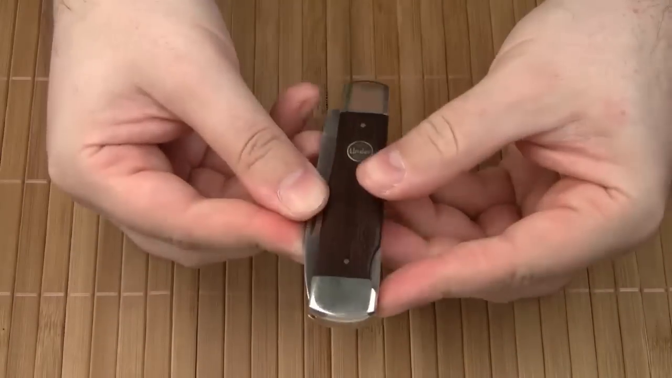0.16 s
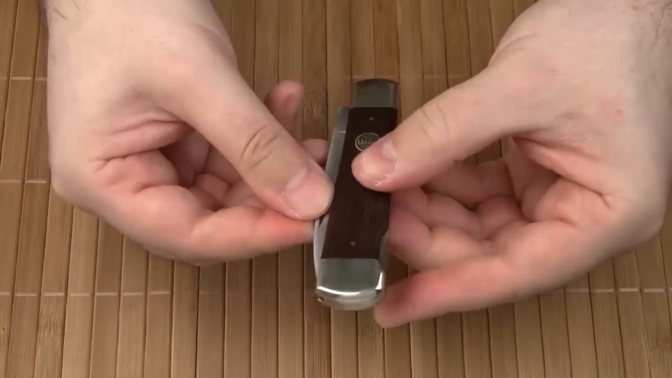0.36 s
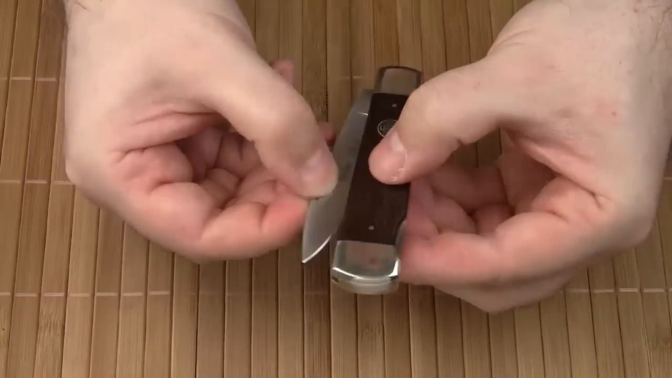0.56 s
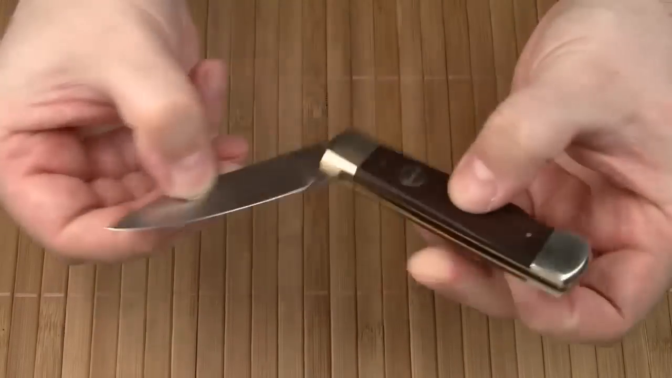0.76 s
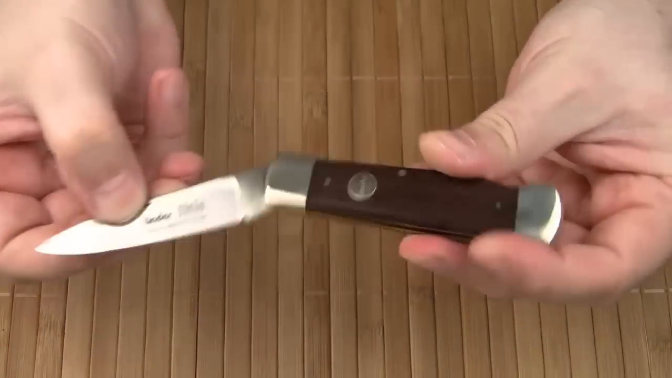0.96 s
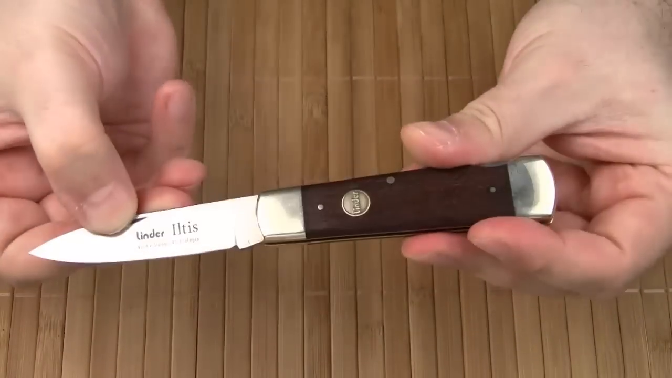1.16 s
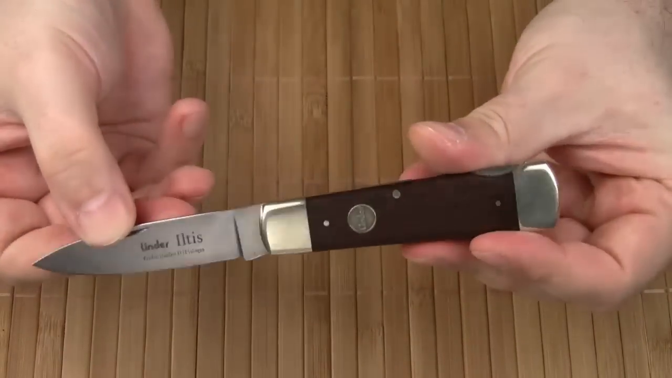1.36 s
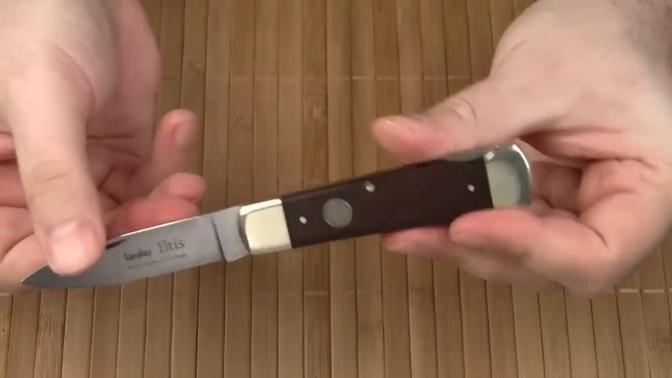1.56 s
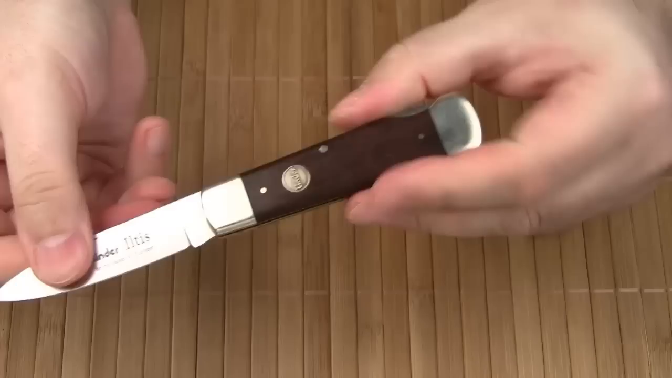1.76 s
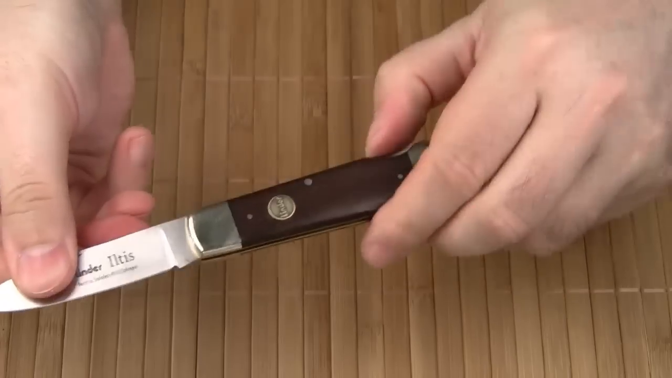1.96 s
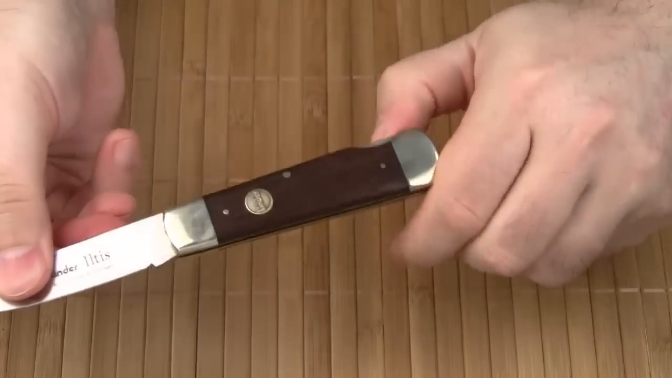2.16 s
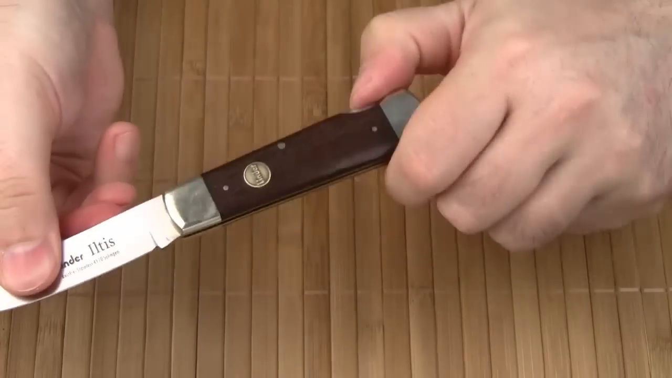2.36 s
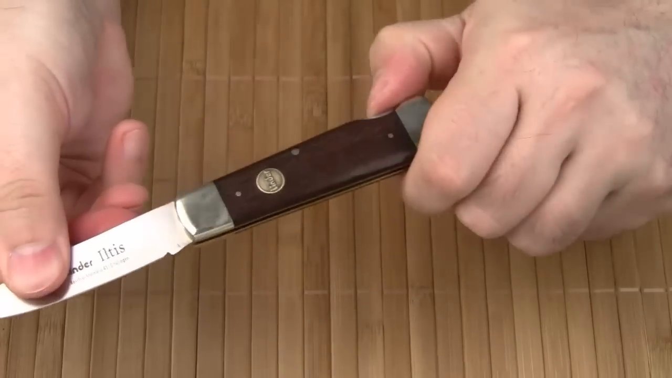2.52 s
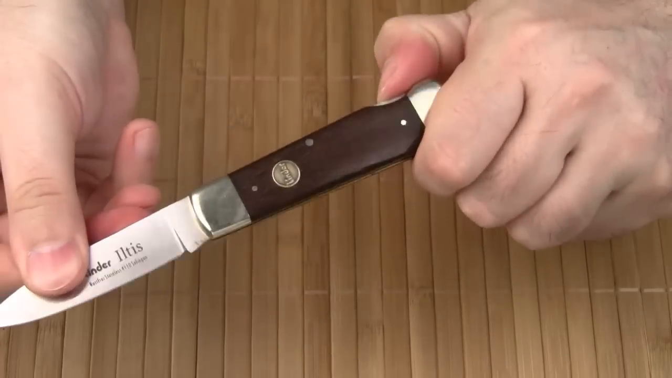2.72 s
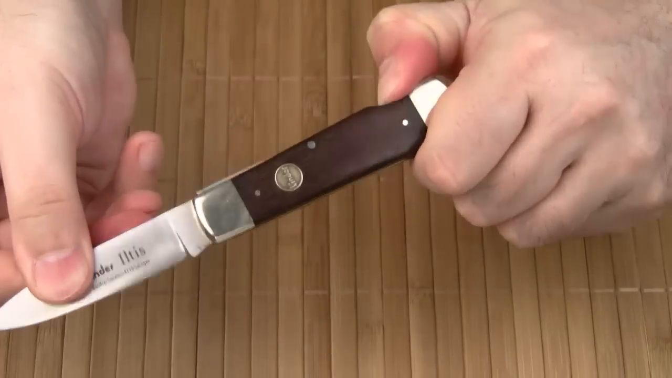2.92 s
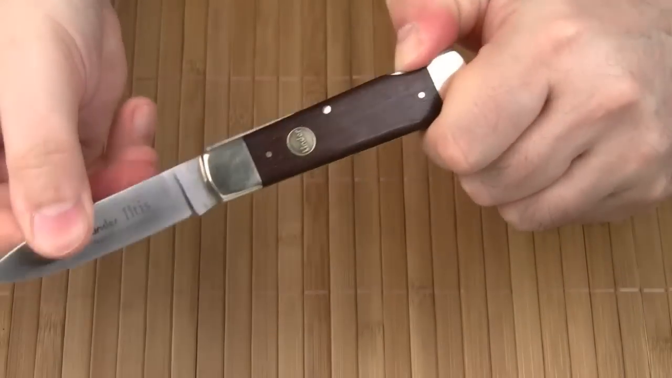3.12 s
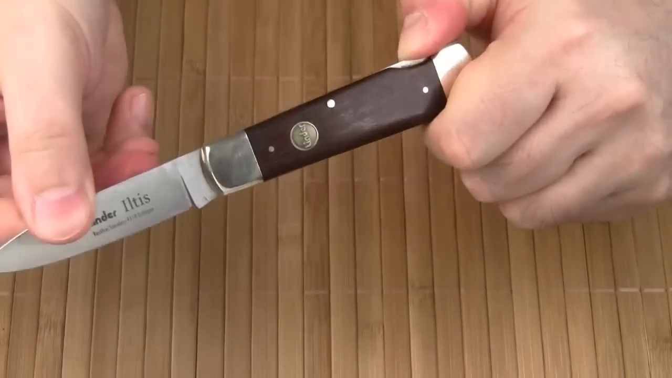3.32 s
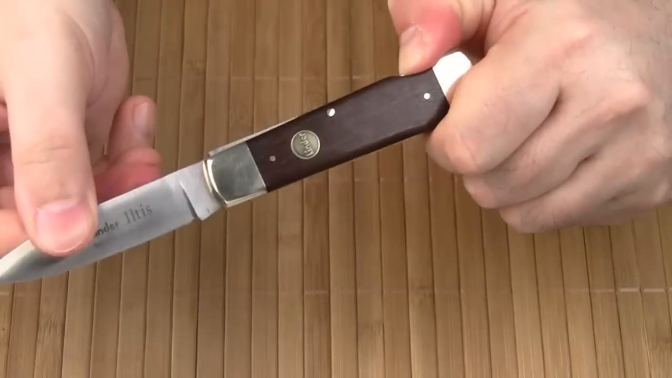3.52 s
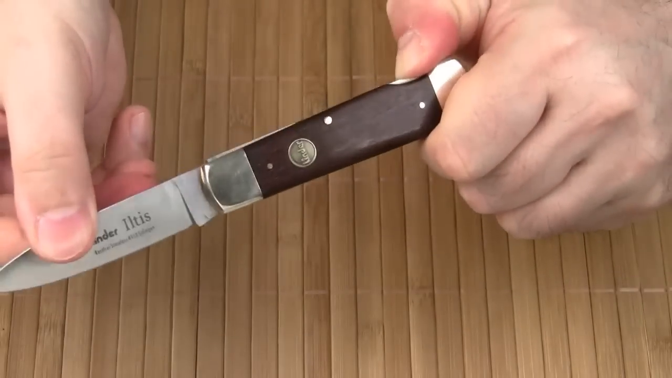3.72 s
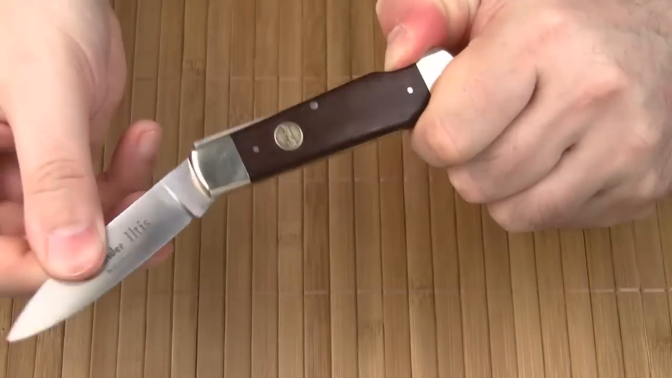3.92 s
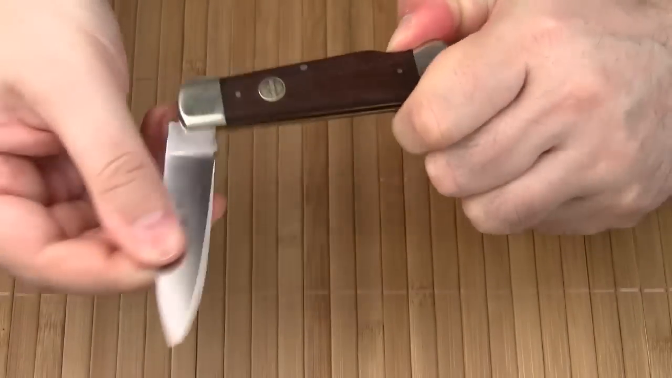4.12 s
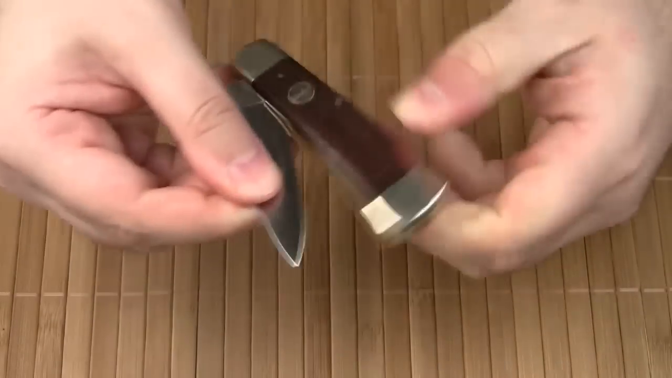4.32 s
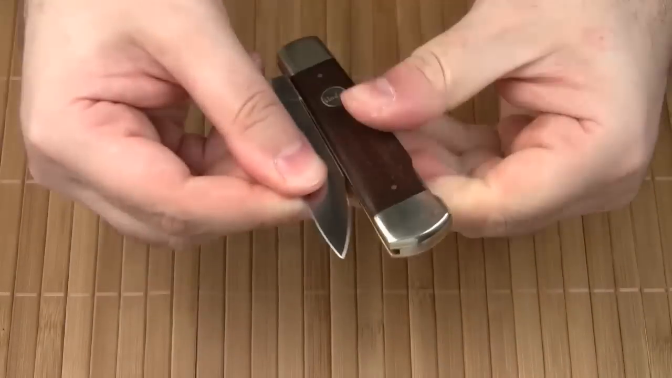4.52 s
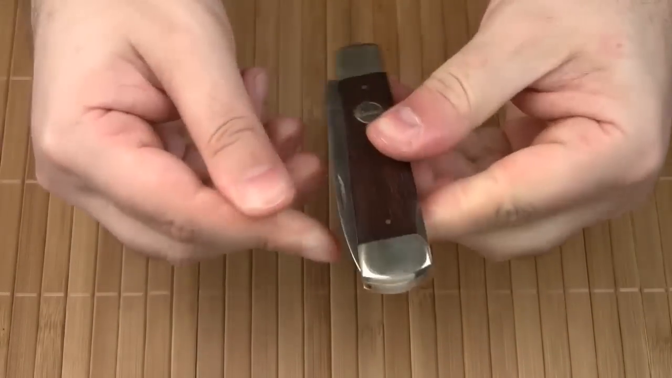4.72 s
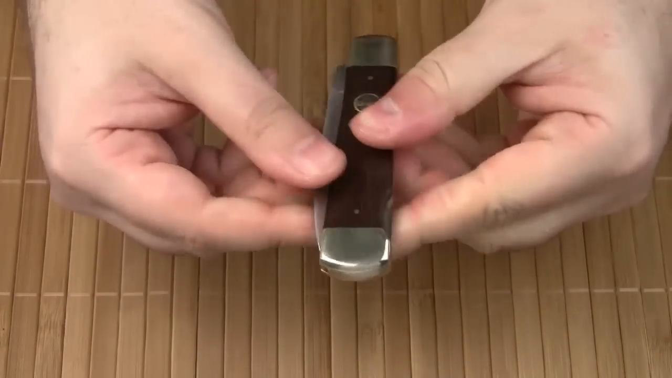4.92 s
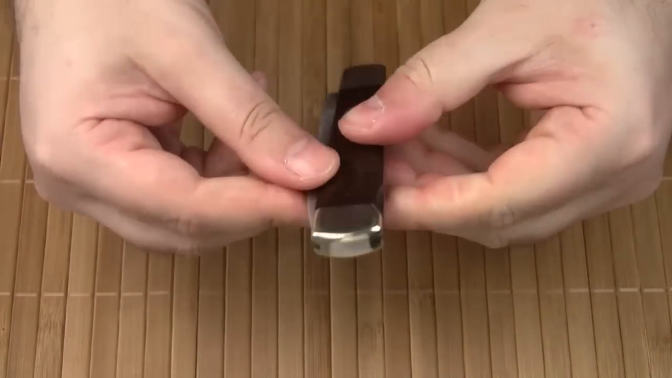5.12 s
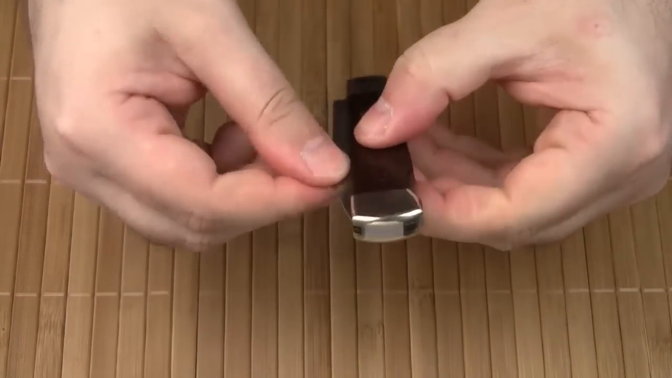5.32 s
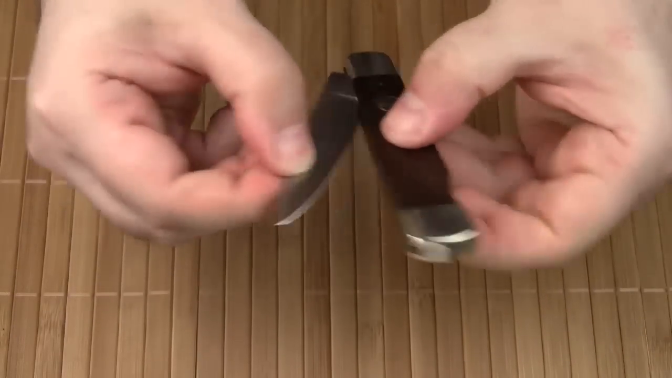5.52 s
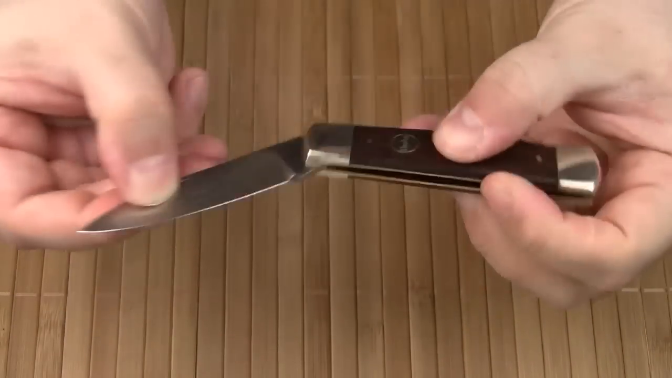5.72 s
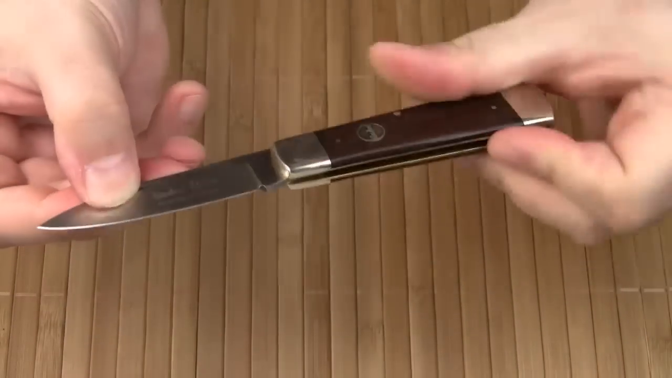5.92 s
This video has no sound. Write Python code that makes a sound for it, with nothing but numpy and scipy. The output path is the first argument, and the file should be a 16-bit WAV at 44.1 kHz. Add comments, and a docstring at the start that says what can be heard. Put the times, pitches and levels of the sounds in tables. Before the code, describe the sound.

Close stereo handling sounds indoors: a quick stuttering nail creak on steel, a brief skin swish, and a piercing metallic crack as the knife locks. After a pause come three light, rattling lock clicks, then a crisp, thicker snap as the blade folds into its handle. Faint nail slips and a barely audible blade grind lead to another loud locking crack. Short room echoes, faint hum, rumble and hiss remain.

```python
"""A lock-back pocket knife is worked by hand over a bamboo mat, close to two microphones in a small room.
A thumbnail creaks on the blade, the blade snaps into its lock, and the lock bar clicks three times.
The blade snaps shut, then the nail slips again, the blade grinds round and snaps into the lock once more.
Contacts are short force pulses that ring the knife; friction and skin are shaped noise throughout.
The room adds echoes, rumble, hum and hiss; the input stage flattens the loudest peaks."""
import sys
import numpy as np
from scipy import signal
from scipy.fft import rfft, irfft
from scipy.io import wavfile
from scipy.ndimage import map_coordinates

SR = 44100
rng = np.random.default_rng(int(sys.argv[2]) if len(sys.argv) > 2 else 0)


def transcribe(u):
    """Save the signal u as a 16-bit wav file named by the first command-line argument.

    u: samples, shape (n,) or (channels, n), limited to [-1, 1]; the rate is SR.
    q: integer samples, one column per channel.
    """
    v = np.clip(np.atleast_2d(u).T, -1, 1)
    q = np.round(v * 32767).astype(np.int16)
    wavfile.write(sys.argv[1], SR, q)


N = 267951
T = np.arange(N) / SR

# Blade snapping into the lock: start_s, level_db (over 1 ms), recoil_hz, recoil_peak_db (before panning)
LOCK_SNAPS = [(1.1065, 4.5, 503, -11), (5.892, 3.5, 840, -9)]
# Spring pulling the blade into the handle: start_s, level_db (over 1 ms)
SHUT_SNAPS = [(4.7666, -5.5)]
# Lock bar pressed by the thumb: start_s, level_db (over 1 ms)
BAR_PRESSES = [(3.0965, -25), (3.3989, -25.5), (3.7042, -22.5)]
# Single slips of the thumbnail on the blade: start_s, level_db (over 1 ms)
SINGLE_NAIL_SLIPS = [(0.5912, -30.5), (0.6002, -34), (5.2843, -50.5), (5.334, -48.5), (5.3884, -46.5),
                     (5.4193, -45.5), (5.4403, -44), (5.4764, -33.5), (5.778, -46.5)]
# Play in the pivot: start_s, level_db (over 1 ms)
PIVOT_PLAY = [(.1461, -38.5), (3.2874, -46.5), (3.5069, -46.5), (3.5279, -45.5), (3.9814, -39.5),
              (4.4462, -49), (4.5197, -50)]
# Blade friction in the pivot as it swings out: centre_s, length_s, level_db
BLADE_SWINGS = [(5.64, 0.34, -60)]
# Strokes of skin over the handle: centre_s, length_s, level_db
SKIN_STROKES = [(0.839, .07, -55), (1.91, .15, -61.5), (3.0, .1, -69.5), (4.377, .15, -58),
                (5.684, .12, -58), (6.05, 0.17, -62.5)]
# Thumb rubbing along the blade: centre_s, length_s, level_db
THUMB_RUBS = [(.411, 0.0084, -56), (.55, 0.1, -61), (5.015, 0.017, -59.5), (5.53, 0.056, -52)]
# Soft bumps of the hands on the handle: centre_s, length_s, level_db
HAND_BUMPS = [(1.066, 0.12, -52.5), (1.23, 0.18, -54), (2.999, 0.064, -52.5), (5.28, 0.066, -54),
              (5.41, .14, -49)]

# Resonances of each part: pitch_hz, width_hz, level_db (relative)
# Knife open and locked; the last, very wide one is the crack of the contact
OPEN_KNIFE_MODES = [(1530, 260, -14.5), (3214, 450, -8), (4136, 620, -5.5), (5785, 310, -2),
                    (6170, 230, -0.5), (6904, 470, -9), (8830, 500, -9.5), (9890, 590, -9),
                    (10850, 570, -15), (11400, 610, -19.5), (12500, 1600, -22.5), (7000, 6300, -18.5)]
# Knife closed, again with the wide crack last
SHUT_KNIFE_MODES = [(1710, 1400, -26), (4060, 1200, -5), (4423, 620, 4.5), (6300, 1100, -0.5),
                    (7720, 810, 2), (8900, 570, 5), (11190, 1700, -17.5), (13800, 2000, -12),
                    (7100, 6100, -15)]
# Lock bar: pitch_hz, width_hz, level_db
LOCK_BAR_MODES = [(1919, 700, -15.5), (2800, 400, -6.5), (4070, 780, -6), (5880, 1000, -1.5),
                  (6700, 790, 1), (8160, 860, -5), (9706, 1100, -13.5), (13200, 2400, -21)]
# Nail and gripped blade: pitch_hz, width_hz, level_db
NAIL_BLADE_MODES = [(746, 410, -7.5), (1450, 190, -5), (2275, 1040, -10.5), (4240, 520, -2.5),
                    (5088, 330, -0.5), (7000, 1340, -12.5), (12570, 2000, -31.5)]
# Pivot: pitch_hz, width_hz, level_db
PIVOT_JOINT_MODES = [(1510, 260, -8), (3320, 1500, -11.5), (4810, 170, 1.5), (5440, 350, 0.5),
                     (6860, 1600, -4), (10460, 2000, -12.5), (13340, 1500, -21)]
# Half-open blade: pitch_hz, width_hz, level_db
HALF_OPEN_MODES = [(1090, 600, -5), (1850, 98, 1.5), (3640, 160, -6), (5000, 300, -11)]

# Noise colours: frequency_hz, level_db (per Hz, relative)
# Skin sliding on the handle
SKIN_COLOUR = [(400, -9), (1200, -2.5), (3000, -2.5), (5200, 1), (8000, 1.5), (10000, -3), (13000, -8.5),
               (16000, -14)]
# Wall echoes: frequency_hz, level_db
ECHO_COLOUR = [(150, -7.5), (900, -7), (1600, 0), (4000, 2.5), (6000, 1.5), (9000, 1.5), (12000, -1.5),
               (16000, -4.5)]
# Room rumble: frequency_hz, level_db
AIR_COLOUR = [(20, -10.5), (47, -8), (62, -8), (100, 1), (135, -4.5), (165, -2), (210, -8), (300, -10.5),
              (500, -15), (1000, -21), (3000, -26.5), (8000, -30.5), (15000, -39.5)]
# Self-noise of each microphone: frequency_hz, level_db
HISS_COLOUR = [(20, -3.5), (70, 9), (170, 12.5), (350, 6.5), (1000, 5.5), (4000, 2), (10000, -4),
               (16000, -16.5)]
# Hum of an appliance: pitch_hz, level_db (rms)
HUM_TONES = [(245.2, -60), (48.7, -75.5), (2540, -83.5)]

# The nail creaks as the pull builds: first and last slip, growth of each wait between slips
CREAK_FROM_S, CREAK_TO_S, CREAK_GROWTH = .4551, .5599, 1.085
CREAK_DB, CREAK_RISE_DB = -31, 19  # level the slips climb towards, and how far below it the first one lies
SCRAPE_S = 0.012  # steel scrapes over the spring for this long before it lets go
HOLD_DB = -79.5  # skin on the handle while the hands only hold it
AIR_DB, HISS_DB = -58.5, -67.5
TOP_HZ = 16200


def undb(db):
    """Decibels to gain."""
    return 10 ** (np.asarray(db) / 20)


def add(track, s, sound):
    """Mix a sound into a track at time s."""
    start = max(int(s * SR), 0)
    part = sound[:max(N - start, 0)]
    track[start:start + len(part)] += part


def swells(rows):
    """Smooth rises and falls of gain from (centre_s, length_s, level_db) rows."""
    return sum(undb(db) * np.exp(-(2 * (T - s) / length) ** 2) for s, length, db in rows)


def coloured(points, size=N):
    """Noise of rms 1 with a spectrum of (frequency_hz, level_db) points."""
    hz, db = np.transpose(points)
    bins = np.maximum(np.fft.rfftfreq(size, 1 / SR), 1)
    gain = undb(np.interp(np.log(bins), np.log(hz), db))
    noise = irfft(rfft(rng.standard_normal(size)) * gain, size)
    return noise / noise.std()


def ring(push, modes, size=1024):
    """Damped resonances driven by a force; neighbouring modes swing in opposite directions."""
    t = np.arange(size) / SR
    body = np.zeros(size)
    for k, (hz, width, db) in enumerate(modes):
        decay = np.exp(-np.pi * width * t)
        body += (-1) ** k * undb(db) * width * decay * np.sin(2 * np.pi * hz * t)
    return signal.fftconvolve(push, body)


def clicks(events, modes, bounce_s, bounce_db, chatter_db, chatter_s, size=1024):
    """Each contact is a hard blow, one bounce and a brief chatter of the loose parts; the struck part rings."""
    track, t = np.zeros(N), np.arange(size) / SR
    for s, db, *_ in events:
        chatter = rng.standard_normal(size) * np.exp(-t / chatter_s)
        push = undb(chatter_db) * chatter / np.linalg.norm(chatter)
        push[0] += 1  # the blow
        push += undb(bounce_db) * np.sinc((t - bounce_s) * SR)
        sound = ring(push, modes)
        # level the click's whole energy as if it were spread over 1 ms
        sound *= np.sqrt(SR / 1000) / np.linalg.norm(sound)
        add(track, s, undb(db) * sound)
    return track


def recoil(delay_s=0.0009, pan_db=-3.0):
    """The whole knife jerks once in the hand as it locks: one low swing of pressure, heard only close by."""
    track = np.zeros(N)
    for s, _, hz, db in LOCK_SNAPS:
        phase = 2 * np.pi * hz * (T - s - delay_s)
        track += undb(db) * phase * np.exp((1 - phase ** 2) / 2)
    return track * undb(np.array([[pan_db], [-pan_db]]) / 2)


def creak(count=10, ease=1.8):
    """Stick and slip: as the pull grows the nail holds longer and lets go harder; gives (start_s, level_db)."""
    k = np.arange(count)
    share = (CREAK_GROWTH ** k - 1) / (CREAK_GROWTH ** k[-1] - 1)
    slip_s = CREAK_FROM_S + (CREAK_TO_S - CREAK_FROM_S) * share
    slip_db = CREAK_DB - CREAK_RISE_DB * (1 - k / count) ** ease
    return list(zip(slip_s, slip_db))


def scrapes(events, relative_db, rise_db=12):
    """Gritty friction of tang on spring that grows and runs on into each click, in step with its strength."""
    track, count = np.zeros(N), int((SCRAPE_S + .003) * SR)  # runs 3 ms past the contact
    for s, db, *_ in events:
        force = rng.standard_normal(count) * rng.exponential(size=count)
        grit = ring(force, LOCK_BAR_MODES)[:count]
        level = undb(db + relative_db + np.linspace(-rise_db, 0, count))
        add(track, s - SCRAPE_S, grit / grit.std() * level)
    return track


def swing(sag_per_s=.4):
    """The tang grinds on the spring as the blade turns; the blade rings faintly, sinking in pitch."""
    track = np.zeros(N)
    for s, length, db in BLADE_SWINGS:
        force = rng.standard_normal(N) * rng.exponential(size=N)
        grind = ring(force, HALF_OPEN_MODES)[:N]
        # playback speed starts above 1 and falls through it mid-swing
        pitch = 1 - sag_per_s * np.clip(T - s, -length, length)
        bent = map_coordinates(grind / grind.std(), [np.cumsum(pitch)], mode="mirror")
        track += swells([(s, length, db)]) * bent
    return track


def hands(grain_db=2):
    """Skin hisses as it slides, grainy from its ridges; the thumb rubs the blade; grip changes bump dully."""
    grain = undb(grain_db * coloured([(20, -0.5), (300, -5.5), (1000, -41)]))
    sliding = undb(HOLD_DB)
    for s, length, db in SKIN_STROKES:
        sliding = sliding + undb(db) / (1 + (2 * (T - s) / length) ** 2)
    swish = coloured(SKIN_COLOUR) * sliding
    rub = ring(rng.standard_normal(N), NAIL_BLADE_MODES)[:N]
    rub = swells(THUMB_RUBS) * rub / rub.std()
    bump = coloured([(30, -19), (90, -1.0), (130, -4.5), (250, -17.5), (900, -43.0), (4000, -78.0)])
    return grain * (swish + rub) + swells(HAND_BUMPS) * bump


def mat_echo(x, lag_s, echo_db):
    """The mat under the hands throws each click back once."""
    return undb(echo_db) * np.pad(x, (int(lag_s * SR), 0))[:N]


def widen(x, lag_s=4e-6):
    """A tiny lag between the two channels widens the knife's sound slightly, mostly in the treble."""
    turn = np.exp(1j * np.pi * np.fft.rfftfreq(N, 1 / SR) * lag_s)
    return irfft(rfft(x) * np.array([turn, turn.conj()]), N)


def room(x, wet_db=-25, t60_low_s=0.45, t60_high_s=0.28, hold_s=0.34, side_db=-27):
    """After 5 ms of silence the wall echoes hold almost level, then die away, the treble first."""
    t = T[:SR * 2 // 3]
    # both microphones hear the echoes almost alike
    middle, side = coloured(ECHO_COLOUR, len(t)), coloured(ECHO_COLOUR, len(t))
    echoes = middle + undb(side_db) * side * np.array([[1], [-1]])
    low = signal.sosfiltfilt(signal.butter(2, 7500, fs=SR, output="sos"), echoes)
    low_tail = low * np.exp(-np.log(1000) * t / t60_low_s)
    high_tail = (echoes - low) * np.exp(-np.log(1000) * t / t60_high_s)
    # a slowly growing gain offsets part of the early decay
    tail = (low_tail + high_tail) * (1 - .8 * np.exp(-t / hold_s)) * (t > .005)
    tail /= np.linalg.norm(tail[0])
    return undb(wet_db) * signal.fftconvolve(x[None], tail, axes=1)[:, :N]


def background():
    """Room rumble and an appliance's steady tones, with separate hiss in each microphone."""
    hum = sum(undb(db) * np.sqrt(2) * np.sin(2 * np.pi * (hz * T + rng.random())) for hz, db in HUM_TONES)
    rumble = undb(AIR_DB) * coloured(AIR_COLOUR)
    hiss = undb(HISS_DB) * np.array([coloured(HISS_COLOUR), coloured(HISS_COLOUR)])
    return rumble + hum + hiss


def scene():
    """Knife and hands close to the middle, the low recoil leaning to one side, the room around them."""
    locks = clicks(LOCK_SNAPS, OPEN_KNIFE_MODES,
                   bounce_s=.00069, bounce_db=-12, chatter_db=-9, chatter_s=.001)
    shuts = clicks(SHUT_SNAPS, SHUT_KNIFE_MODES,
                   bounce_s=.00064, bounce_db=-6, chatter_db=-6, chatter_s=.002)
    bar = clicks(BAR_PRESSES, LOCK_BAR_MODES,
                 bounce_s=0.000496, bounce_db=-11, chatter_db=5.0, chatter_s=0.0023)
    nail = clicks(creak() + SINGLE_NAIL_SLIPS, NAIL_BLADE_MODES,
                  bounce_s=.0009, bounce_db=-6, chatter_db=-7, chatter_s=.002)
    pivot = clicks(PIVOT_PLAY, PIVOT_JOINT_MODES,
                   bounce_s=.0005, bounce_db=-25, chatter_db=8, chatter_s=.002)
    friction = scrapes(LOCK_SNAPS, relative_db=-41.5) + scrapes(BAR_PRESSES, relative_db=-18.5) + swing()
    near = locks + shuts + bar + nail + pivot + friction + hands()
    # the echo from the mat depends on how high and which way the knife is held
    mat = mat_echo(locks, lag_s=0.0033, echo_db=-24.5)
    mat += mat_echo(shuts, lag_s=0.0041, echo_db=-14.5)
    mat += mat_echo(bar + nail + pivot, lag_s=0.0027, echo_db=-14.5)
    # the lock bar faces away from the microphones, so more of its click comes by way of the walls
    to_walls = near + undb(-5) * bar
    return widen(near + mat) + recoil() + room(to_walls) + background()


def record(dry, ceiling=0.84):
    """The input stage flattens peaks above its ceiling; a steep low-pass then cuts the top."""
    limited = np.clip(dry, -ceiling, ceiling)
    return signal.sosfilt(signal.ellip(8, .2, 70, TOP_HZ, fs=SR, output="sos"), limited)


dry = scene()
out = record(dry)
transcribe(out)
```